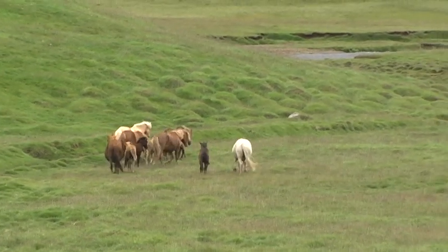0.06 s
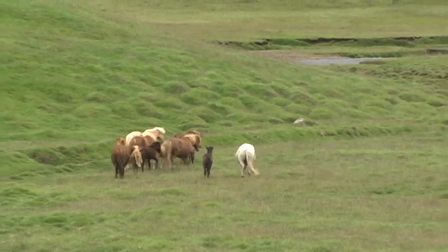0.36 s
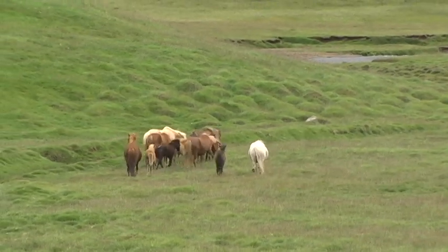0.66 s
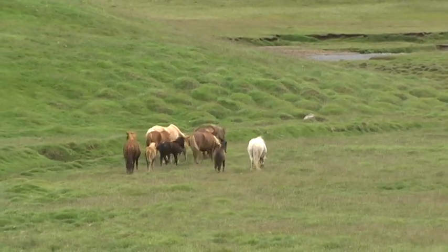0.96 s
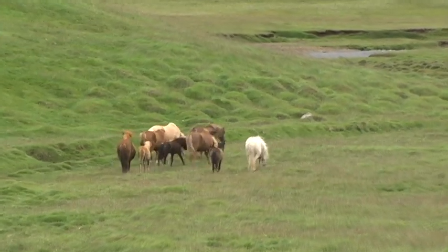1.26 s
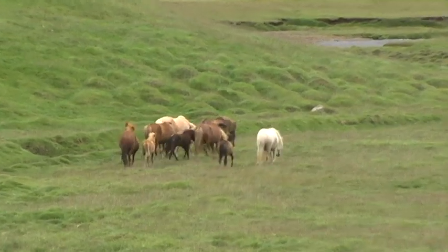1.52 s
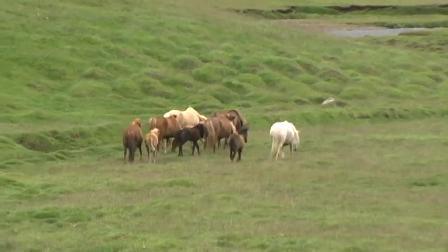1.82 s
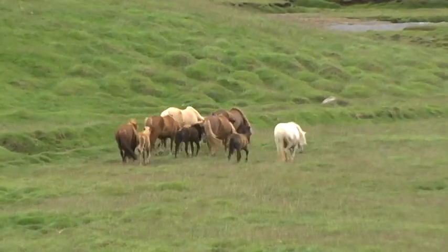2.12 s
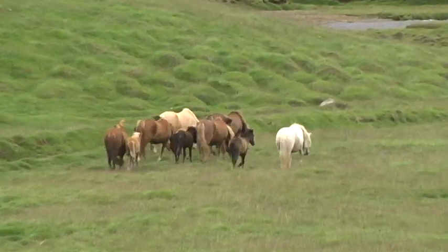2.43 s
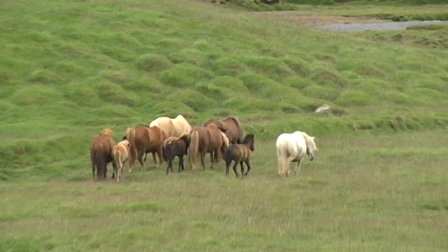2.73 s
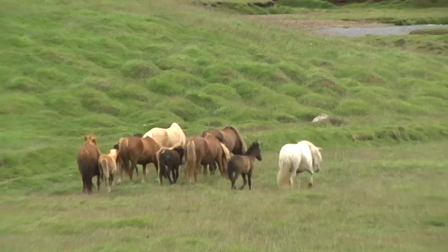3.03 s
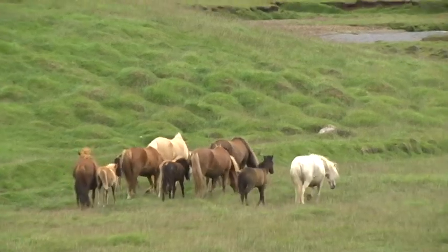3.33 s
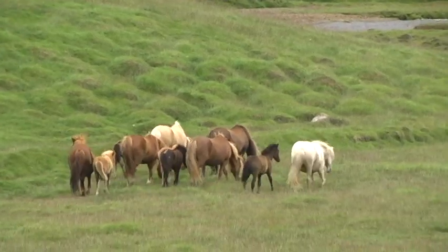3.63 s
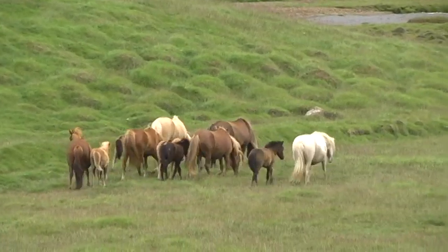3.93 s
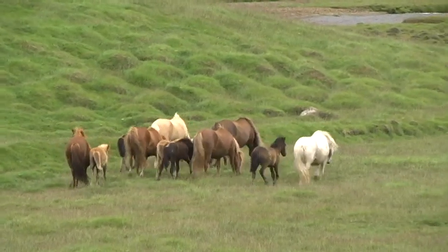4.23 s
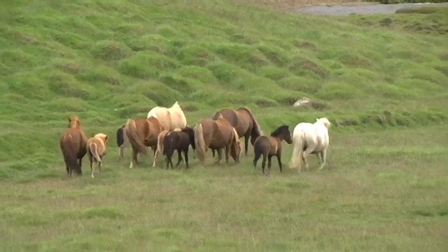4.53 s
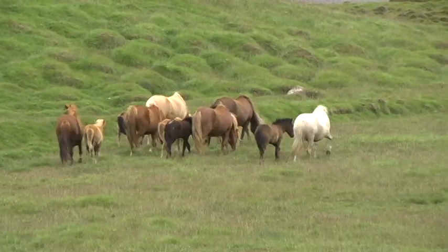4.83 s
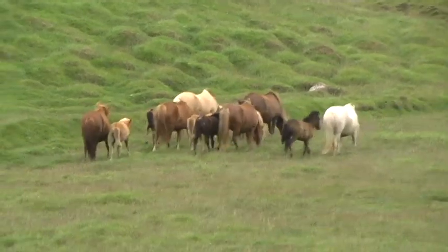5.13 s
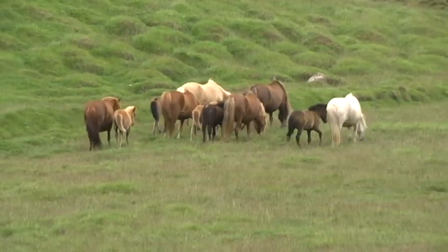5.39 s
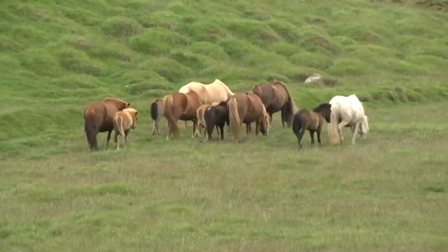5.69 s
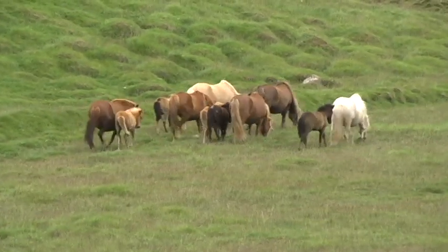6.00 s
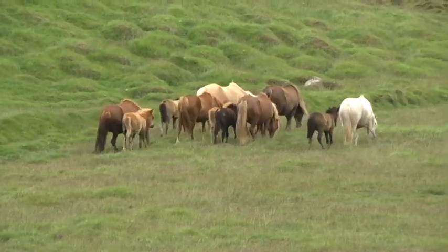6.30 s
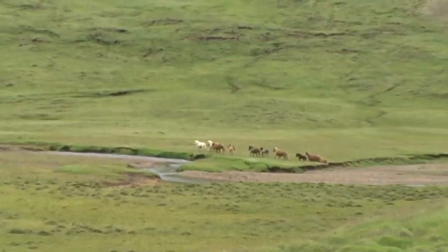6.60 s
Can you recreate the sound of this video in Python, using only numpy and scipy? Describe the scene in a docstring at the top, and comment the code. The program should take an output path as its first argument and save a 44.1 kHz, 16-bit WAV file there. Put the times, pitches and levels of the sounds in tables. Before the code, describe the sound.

A soft, steady hush of distant stream and grass fills an open pasture, with a very faint camera whine underneath. Right at the start a small bird chips once and a grazing animal gives a faint, low call that sinks and fades by 0.6 seconds. Wind puffs dully on the microphone, stronger around 1 second, then eases to a light rumble before picking up again near 4.5 seconds. Small dry ticks sound close by now and then, clearest at 1.5 and 5.4 seconds. From about 4.7 to 5.9 seconds a wading bird whistles a faint, quick trill. At 6.1 seconds a horse begins a high, rising, quavering whinny, slightly to the right. It cuts off with a click at about 6.4 seconds, as a sudden hard gust buffets the microphone with loud, ragged rumbling and sharp snaps until the end, near 6.8 seconds.

```python
"""Windy hillside pasture

A far stream, grass hiss and a faint camera whine lie under wind that buffets two microphone ports.
A grazing animal gives a low, fading call through its throat resonances; a small bird chips, a wading
bird whistles a trill, and small ticks ring close by. A horse starts a high, two-voiced whinny,
which cuts off with a click as a hard gust takes over."""
import sys
import numpy as np
from scipy import signal
from scipy.fft import rfft, irfft, next_fast_len
from scipy.io import wavfile
from scipy.ndimage import map_coordinates

SR = 44100
rng = np.random.default_rng(int(sys.argv[2]) if len(sys.argv) > 2 else 0)


def generate_wav(sig):
    """Save sig (samples, or channels by samples) to the path in sys.argv[1] as 16-bit PCM at SR."""
    pcm = np.round(np.clip(np.atleast_2d(sig).T, -1, 1) * 32767).astype(np.int16)
    wavfile.write(sys.argv[1], SR, pcm)


N = 297675
GUST_START_S = 6.37


def amp(db):
    """Decibels to gain."""
    return 10 ** (np.asarray(db) / 20)


def unit(x):
    """Scale to rms 1."""
    return x / np.sqrt(np.mean(x ** 2) + 1e-20)


def clock():
    """Sample times in seconds."""
    return np.arange(N) / SR


def along(rows, hz):
    """Table columns interpolated over log frequency."""
    f, *cols = np.transpose(rows)
    return [np.interp(np.log(hz + 1), np.log(f + 1), c) for c in cols]


def curves(rows):
    """Table columns interpolated over time, per sample."""
    s, *cols = np.transpose(rows)
    return [np.interp(clock(), s, c) for c in cols]


def wobble(rate_hz):
    """Smooth random curve with knots at rate_hz."""
    knots = rng.standard_normal(int(N * rate_hz / SR) + 4)
    return map_coordinates(knots, [np.arange(N) * rate_hz / SR])


def filtered(x, response):
    """Apply a complex frequency response."""
    m = next_fast_len(N + SR // 2)
    return irfft(rfft(x, m) * response(np.fft.rfftfreq(m, 1 / SR)), m)[..., :N]


def resonance(f, centre_hz, width_hz):
    """Response of one damped resonance."""
    return 1j * f * width_hz / (centre_hz ** 2 - f ** 2 + 1j * f * width_hz)


def noise_band(centre_hz, width_hz, shape=N):
    """Noise through two equal resonances, rms 1."""
    return unit(filtered(rng.standard_normal(shape), lambda f: resonance(f, centre_hz, width_hz) ** 2))


def between(start_s, end_s):
    """Gate with 3 ms edges."""
    return np.clip(np.minimum(clock() - start_s, end_s - clock()) / .003, 0, 1)


def bell(centre_s, half_s):
    """Gaussian envelope, 1/e at half_s from the centre."""
    return np.exp(-np.minimum(((clock() - centre_s) / half_s) ** 2, 60))


def swells(rows):
    """Gain of (time [s], peak [dB], half length [s]) bells, summed in power."""
    return np.sqrt(sum(amp(2 * db) * bell(s, half_s) for s, db, half_s in rows))


def phase_of(hz):
    """Running phase of a pitch curve."""
    return 2 * np.pi * np.cumsum(hz) / SR


def voice(rows, jitter, jitter_rate_hz, bend_hz=0):
    """Phase and gain of an unsteady oscillator on (time [s], pitch [Hz], level [dB]) rows."""
    hz, db = curves(rows)
    phase = phase_of((hz + bend_hz) * (1 + jitter * wobble(jitter_rate_hz)))
    return phase, amp(db) * between(rows[0][0], rows[-1][0])


def placed(x, pan_db):
    """Mono to stereo, left louder by pan_db."""
    return x * amp([[pan_db / 2], [-pan_db / 2]])


def rush(spectrum, image):
    """Stereo noise with a given spectrum and image, rms 1."""
    m = next_fast_len(N + SR // 2)
    hz = np.fft.rfftfreq(m, 1 / SR)
    coherence, lead_rad, pan_db = along(image, hz)
    turn = np.arccos(np.clip(coherence, -1, 1)) / 2
    coloured = rfft(rng.standard_normal((2, m))) * amp(along(spectrum, hz)[0])
    mid, side = coloured * [np.cos(turn), np.sin(turn)]
    lean = amp(pan_db / 2) * np.exp(1j * lead_rad / 2)
    return unit(irfft(np.array([(mid + side) * lean, (mid - side) / lean]), m)[:, :N])


# Stream and grass noise: (frequency [Hz], relative density [dB])
FIELD_SPECTRUM = [(40, -8), (80, 0), (150, -9), (300, -4.5), (500, -1.5), (780, -0.5), (1500, -3.5),
                  (2600, -9), (3350, -9.5), (4000, -14.5), (5800, -20.5), (6700, -21), (9000, -26),
                  (13000, -31.5)]
# Its stereo image: (frequency [Hz], coherence [ratio], left lead [rad], left minus right [dB])
FIELD_IMAGE = [(200, 1, .1, -10), (700, 0.82, 0.17, -5.5), (2800, 0.83, 0.26, -3), (7000, 0.88, .15, -2),
               (15000, 0.86, 0.027, -1)]


def field(level_db, drift_db, rise_db_per_s):
    """Far stream and grass: an even hush that drifts and slowly grows."""
    hush_db = level_db + rise_db_per_s * clock() + drift_db * (wobble(1.0) + wobble(7))
    return amp(hush_db) * rush(FIELD_SPECTRUM, FIELD_IMAGE)


# Motor whine: (frequency [Hz], relative level [dB])
WHINE_TONES = [(4560, -79.5), (5400, -77.5), (5830, -75), (6290, -84.5), (7500, -85), (9900, -88),
               (14700, -90)]


def camera_whine(fuzz_db, spread_hz, tone_db):
    """Small motor: a fuzzy band around each faint, steady tone."""
    fuzz = sum(amp(db) * wobble(2 * spread_hz) * np.sin(phase_of(hz + spread_hz * wobble(900)))
               for hz, db in WHINE_TONES)
    tones = sum(amp(db) * np.sin(phase_of(hz + 4 * wobble(20))) for hz, db in WHINE_TONES)
    return amp(fuzz_db) * fuzz + amp(tone_db) * tones


def hillside(x, wet_db, t60_s):
    """The grassy slope scatters back a weak, short tail."""
    t = np.arange(SR // 2) / SR
    tail = rng.standard_normal((2, len(t))) * amp(-60 * t / t60_s)
    return x + amp(wet_db) * signal.fftconvolve(x, tail / np.linalg.norm(tail[0]), axes=1)[:, :N]


def far_call(level_db, at_s, half_s, centre_hz, width_hz):
    """Distant answer to the low call; only its top resonance clears the hush."""
    return amp(level_db) * bell(at_s, half_s) * noise_band(centre_hz, width_hz)


# Falling chip: (time [s], pitch [Hz], level [dB])
CHIP_SWEEP = [(0.018, 7100, -56), (0.03, 6550, -58), (0.035, 5700, -44), (0.046, 5100, -52.5),
              (0.052, 4200, -49)]


def chip():
    """Small bird: one thin, buzzy downward sweep."""
    phase, gain = voice(CHIP_SWEEP, jitter=0.028, jitter_rate_hz=710)
    return gain * np.sin(phase)


def trill(level_db, accent_db, accented, scatter_db, sigma_s, arch_hz, count):
    """Wading bird: short arched whistles; early notes scoop up, later ones droop."""
    start_s, gap_s, last_late_s = 4.746, .0929, 0.0091
    base_hz, climb_hz, climb_notes, sag_hz_per_note = 2650, 545, 1.75, 15
    out = np.zeros(N + SR)
    t = np.arange(-SR // 20, SR // 20) / SR
    for k, scatter in enumerate(rng.standard_normal(count)):
        s = start_s + k * gap_s + last_late_s * np.exp(k + 1 - count)
        centre_hz = base_hz - climb_hz * np.exp(-k / climb_notes) - sag_hz_per_note * k
        u = t / (sigma_s * np.interp(s, [4.8, 5.1], [1.4, 1]))  # early notes last longer
        slope_hz = np.interp(s, [4.8, 5.35], [60, -30])
        note = np.exp(-u ** 2 / 2) * np.sin(phase_of(centre_hz + slope_hz * u - arch_hz * u ** 2))
        note_db = level_db + accent_db * (k in accented) + scatter_db * scatter
        out[round((s + t[0]) * SR):][:len(t)] += amp(note_db) * note
    return out[:N]


# Dry ticks nearby: (time [s], relative peak [dB], ring [Hz])
TICK_HITS = [(0.633, -47, 3300), (1.5162, -36.5, 1650), (2.1446, -44, 3150), (3.3803, -46.5, 3520),
             (4.4831, -41, 2880), (4.8889, -45.5, 6200), (5.035, -39, 3220), (5.1872, -41.5, 2000),
             (5.411, -31.5, 2250)]


def ticks(level_db, t60_s, crack_db, tail_db, tail_t60_s, cutoff_ratio):
    """Each tick: a briefly ringing mode, a dull crack and a short scatter."""
    out = np.zeros(N + SR)
    t = np.arange(SR // 8) / SR
    f = np.fft.rfftfreq(len(t), 1 / SR)
    for s, db, hz in TICK_HITS:
        ring = np.sin(2 * np.pi * hz * t) * amp(-60 * t / t60_s) * (1 - np.exp(-t / 0.00022))
        colour = resonance(f, hz, hz * .8) / (1 + (f / min(cutoff_ratio * hz, 8000)) ** 6)
        noise = unit(irfft(rfft(rng.standard_normal(len(t))) * colour, len(t)))
        decay = amp(crack_db - 60 * t / t60_s) + amp(tail_db - 60 * t / tail_t60_s)
        out[round(s * SR):][:len(t)] += amp(db + level_db) * (ring + noise * decay)
    return out[:N]


# Sinking call: (time [s], pitch [Hz], relative level [dB])
LOW_CALL_CONTOUR = [(0, 197.7, -52), (0.19, 194.1, -52), (0.31, 182.8, -51), (0.36, 186.6, -50),
                    (0.51, 179.7, -52), (0.59, 154.8, -78)]
# Throat resonances: (centre [Hz], half width [Hz], gain [dB])
THROAT_FORMANTS = [(610, 120, 0), (1342, 63, 0), (2130, 157, 0.5)]
# Mouth movement: (time [s], top resonance shift [Hz], swing from lowest to middle resonance [dB])
MOUTH_MOTION = [(0, -130, -2), (0.13, -20, -5.5), (0.3, 43, -0.5), (0.42, 130, 2.5), (0.5, 280, 9)]


def low_call(level_db, shimmer_db, rasp_rad):
    """Grazing animal: vocal pulses through a long throat, hoarser as the pitch sinks."""
    phase, gain = voice(LOW_CALL_CONTOUR, jitter=0.0073, jitter_rate_hz=59.6)
    pitch_hz = curves(LOW_CALL_CONTOUR)[0]
    climb_hz, swing_db = curves(MOUTH_MOTION)
    mouth = [(0, -swing_db), (0, swing_db), (climb_hz, 0)]
    hoarse_rad = rasp_rad * np.interp(clock(), [.3, .42], [.35, 1])
    call = 0
    for k in range(1, 17):
        throat = sum(amp(db + lift_db) / (1 + ((k * pitch_hz - hz - shift_hz) / half_hz) ** 2)
                     for (hz, half_hz, db), (shift_hz, lift_db) in zip(THROAT_FORMANTS, mouth))
        call = call + throat * np.cos(k * phase + hoarse_rad * wobble(130))
    return gain * amp(level_db + shimmer_db * wobble(44.6)) * call


# Rising main voice: (time [s], centre pitch [Hz], relative level [dB])
WHINNY_CONTOUR = [(6.06, 951, -54), (6.1, 1453, -55.5), (6.125, 1530, -40.5), (6.16, 1490, -42),
                  (6.215, 1602, -33.5), (6.28, 1672, -31.5), (6.335, 1706, -39.5), (6.37, 1696, -37)]
# Its harmonics: (multiple [-], gain [dB])
WHINNY_HARMONICS = [(1, 1), (2, -15), (3, -22.5), (4, -50), (5, -43)]
# Independent second voice: (time [s], centre pitch [Hz], level [dB])
SECOND_CONTOUR = [(6.19, 2820, -61), (6.25, 2845, -66), (6.29, 3040, -52), (6.37, 3000, -51.5)]


def whinny(sum_tone_db, rasp_db, rasp_hz, quaver_rate_hz, bend_hz, second_bend_hz, mellowing):
    """Horse: two voices bent by one quaver mix into a sum tone, over a rasp of air."""
    quaver = np.cos(2 * np.pi * quaver_rate_hz * (clock() - 6.12))
    phase, gain = voice(WHINNY_CONTOUR, jitter=0.0035, jitter_rate_hz=210, bend_hz=bend_hz * quaver)
    # overtones swell less than the fundamental
    below_peak_db = max(db for _, _, db in WHINNY_CONTOUR) - curves(WHINNY_CONTOUR)[1]
    main = sum(amp(db + (k > 1) * mellowing * below_peak_db + 2.0 * wobble(40)) * np.sin(k * phase)
               for k, db in WHINNY_HARMONICS)
    phase2, gain2 = voice(SECOND_CONTOUR, jitter=0.009, jitter_rate_hz=550,
                          bend_hz=second_bend_hz * quaver)
    second = np.sin(phase2) + amp(sum_tone_db) * np.sin(phase + phase2)
    # the rising octave crosses the mouth's resonance
    octave = amp(-52.5) * bell(6.086, 0.027) * np.sin(2 * phase)
    # brassy where the voice is pressed
    pressed = amp(-51.0) * bell(6.157, 0.0099) * (np.sin(2 * phase) + np.sin(3 * phase))
    pressed += amp(-60.5) * bell(6.34, 0.023) * np.sin(4 * phase)
    air = amp(rasp_db) * noise_band(rasp_hz, width_hz=1170)
    return gain * (main + air) + gain2 * second + octave + pressed


# Light air between puffs: (time [s], relative level [dB])
LIGHT_AIR = [(0, -56), (0.5, -65.5), (0.75, -57.5), (1.1, -55), (1.38, -68), (1.6, -57.5), (2.6, -61),
             (3.65, -72.5), (4.3, -62.5), (4.85, -50.5), (5.1, -60), (5.6, -61.5), (6.0, -52)]
# Puffs: (time [s], relative peak [dB], half length [s])
AIR_PUFFS = [(0.1, -45.5, 0.039), (0.275, -41.5, 0.014), (0.89, -40, 0.08), (1.045, -39.5, 0.019),
             (1.255, -49.5, 0.011), (1.76, -52.5, 0.028), (1.875, -49.5, 0.018), (2.01, -50, 0.027),
             (2.21, -51.5, 0.016), (2.42, -49, .02), (2.89, -52.5, 0.043), (3.23, -54, 0.016),
             (4.1, -54, 0.017), (4.37, -50.5, .015), (4.5, -43.5, 0.022), (4.625, -38, 0.038),
             (4.785, -48, 0.033), (4.995, -47, 0.012), (5.24, -43.5, .04), (5.46, -53.5, .025),
             (5.87, -42.5, .026)]


def airflow_db(restless_db):
    """Flow level at the ports: restless light air plus puffs."""
    light_air = amp(curves(LIGHT_AIR)[0] + restless_db * wobble(12))
    return 20 * np.log10(np.hypot(light_air, swells(AIR_PUFFS)))


# Breeze turbulence: (frequency [Hz], relative density [dB])
RUMBLE_SPECTRUM = [(20, -23), (45, -6), (85, -0.5), (190, -2), (300, -10), (550, -16), (1000, -28),
                   (2500, -63), (8000, -77)]
# Its stereo image: (frequency [Hz], coherence [ratio], left lead [rad], left minus right [dB])
BREEZE_IMAGE = [(60, 0.65, 0.62, 1.3), (152, 0.24, 1.7, 3), (364, 0.092, 1.22, 3.9),
                (1000, 0.095, 4.5, 1.2)]


def rumble(flow_db, gain_db, lump_db):
    """Dull turbulence, in lumps partly shared by the two ports."""
    lumps = unit(amp(lump_db * (np.array([wobble(32), wobble(32)]) + wobble(18))))
    return amp(flow_db + gain_db) * lumps * rush(RUMBLE_SPECTRUM, BREEZE_IMAGE)


# Strong turbulence, for flutter and blast: (frequency [Hz], relative density [dB])
BLAST_SPECTRUM = [(25, -28), (48, -7), (82, 1), (140, -2), (230, 2), (310, -5), (440, -4.5), (950, -19),
                  (1900, -31), (2800, -41), (6500, -58.5), (15500, -73)]


def flutter(flow_db, gain_db, centre_hz, width_hz, growth):
    """Puffs excite the hollow behind the grille; this grows faster than the rumble."""
    turbulence = rush(BLAST_SPECTRUM, BREEZE_IMAGE)
    hollow = unit(filtered(turbulence, lambda f: resonance(f, centre_hz, width_hz)))
    peak_db = flow_db.max()
    return amp(peak_db + gain_db + growth * (flow_db - peak_db)) * hollow


def sizzle(level_db, centre_hz, width_hz, length_s):
    """Brief, thin hiss where the whinny cuts off."""
    gate = between(GUST_START_S, GUST_START_S + length_s)
    return amp(level_db) * gate * noise_band(centre_hz, width_hz, shape=(2, N))


# Click where the whinny cuts off, then sharp wind snaps: (time [s], relative peak [dB])
CLICK_HITS = [(6.37, -12), (6.438, -12), (6.49, -11), (6.652, -6.5)]


def clicks(level_db, decay_s, rise_s):
    """Cut-off click and wind snaps: steep pulses that swing back, opposite in sign left and right."""
    out = np.zeros(N + SR)
    t = np.arange(SR // 20) / SR
    pulse = (1 - t / decay_s) * np.exp(-t / decay_s) * (1 - np.exp(-t / rise_s))
    for s, db in CLICK_HITS:
        out[round(s * SR):][:len(t)] += amp(db + level_db) * pulse
    return out[:N] * np.array([[.3], [-1]])


# Gust surges: (time [s], relative peak [dB], half length [s])
GUST_SURGES = [(6.45, -25.5, 0.029), (6.59, -20.5, 0.04), (6.77, -24.5, 0.044)]
# Single eddies: (time [s], relative peak [dB])
EDDY_HITS = [(0.275, -35.5), (0.842, -29.5), (0.872, -27.5), (0.912, -25.5), (1.029, -33), (4.596, -38),
             (4.78, -31.5), (6.413, -13.5), (6.435, -5), (6.494, -3), (6.552, -14.5), (6.6, -11),
             (6.631, -9.5), (6.652, -5), (6.741, -11)]
# Their stereo image: (frequency [Hz], coherence [ratio], left lead [rad], left minus right [dB])
BLAST_IMAGE = [(60, 0.32, 3, 2.8), (250, 0.75, 3, 1.8), (690, 0.56, 3.5, 1.4), (1450, 0.069, 3, 0.89),
               (2270, 0.27, -1.5, 1), (7000, 0.68, 0.9, 1.5)]


def blast(gust_db, start_db, build_db_per_s, eddy_db, eddy_half_s):
    """Single eddies and a sudden, surging gust hit the ports across the whole band."""
    building = amp(start_db + build_db_per_s * (clock() - GUST_START_S))
    gust = amp(gust_db) * np.hypot(building, swells(GUST_SURGES)) * between(GUST_START_S, np.inf)
    eddies = amp(eddy_db) * swells([(s, db, eddy_half_s) for s, db in EDDY_HITS])
    return np.hypot(gust, eddies) * rush(BLAST_SPECTRUM, BLAST_IMAGE)


def wind(tear_db):
    """Turbulence on the ports: brighter and more ragged as the flow grows."""
    flow_db = airflow_db(restless_db=1.7)
    dull = rumble(flow_db, gain_db=2.0, lump_db=1.78)
    hollow = flutter(flow_db, gain_db=-7, centre_hz=517, width_hz=480, growth=1.39)
    hard = blast(gust_db=6.5, start_db=-37, build_db_per_s=19.5, eddy_db=-4.5, eddy_half_s=0.0066)
    ragged = unit(amp(tear_db * wobble(300)))
    return dull + (hollow + hard) * ragged


def scene():
    """Field hush, ticks, whine and wind; the calls cut off at the gust."""
    wader = trill(level_db=-54.0, accent_db=4.5, accented=(1, 5, 12), scatter_db=0.3,
                  sigma_s=.009, arch_hz=18, count=13)
    birds = wader + chip()
    grazer = low_call(level_db=-6.5, shimmer_db=3.0, rasp_rad=1.0)
    answer = far_call(level_db=-64.5, at_s=3.43, half_s=0.18, centre_hz=2080, width_hz=430)
    horse = whinny(sum_tone_db=-4.5, rasp_db=-17, rasp_hz=2050, quaver_rate_hz=11.6,
                   bend_hz=35.7, second_bend_hz=170, mellowing=0.26)
    animals = (placed(birds, pan_db=0) + placed(grazer, pan_db=-8.0)
               + placed(answer, pan_db=-1) + placed(horse, pan_db=-5.5))
    calls = hillside(animals, wet_db=-9.5, t60_s=0.19) * (1 - between(GUST_START_S, np.inf))
    near = ticks(level_db=-2, t60_s=0.013, crack_db=-13.5, tail_db=-12.5, tail_t60_s=0.059,
                 cutoff_ratio=2.34)
    whine = camera_whine(fuzz_db=-0.5, spread_hz=130, tone_db=-2)
    air = wind(tear_db=2.5)
    hush = field(level_db=-56.5, drift_db=0.23, rise_db_per_s=0.3056)
    crackle = clicks(level_db=-8, decay_s=0.0015, rise_s=.00003)
    crackle += sizzle(level_db=-62, centre_hz=10200, width_hz=3200, length_s=.035)
    return hush + whine + placed(near, pan_db=-4.5) + calls + air + crackle


def record(dry):
    """The camera soft-clips the highest peaks and limits the band."""
    ceiling, top_hz = .92, 15800
    rounded = dry / (1 + np.abs(dry / ceiling) ** 6) ** (1 / 6)
    return filtered(rounded, lambda hz: hz < top_hz)


dry = scene()
out = record(dry)
generate_wav(out)
```